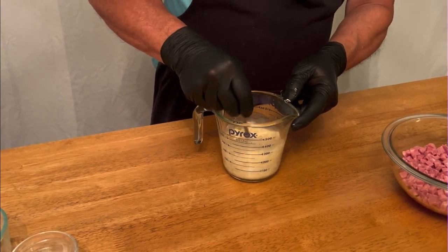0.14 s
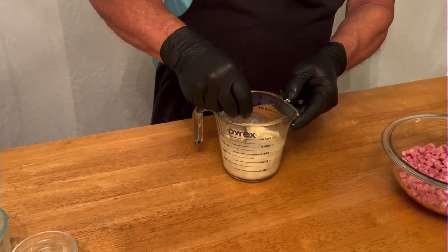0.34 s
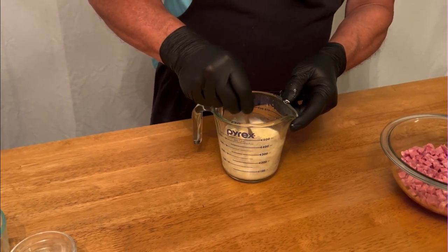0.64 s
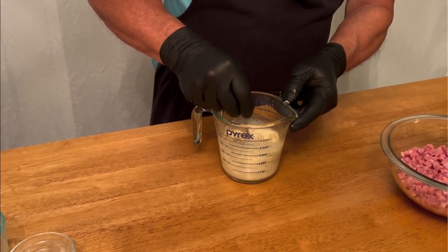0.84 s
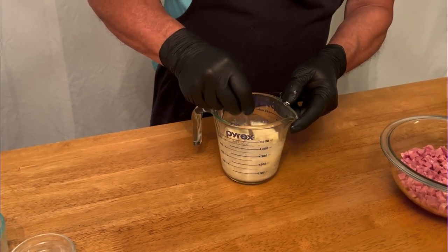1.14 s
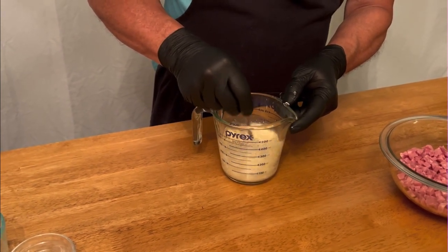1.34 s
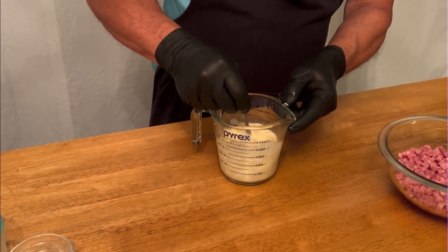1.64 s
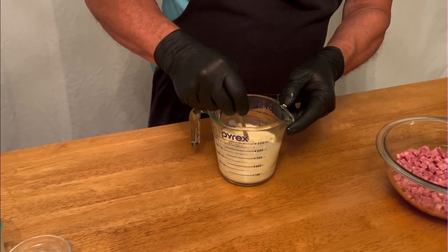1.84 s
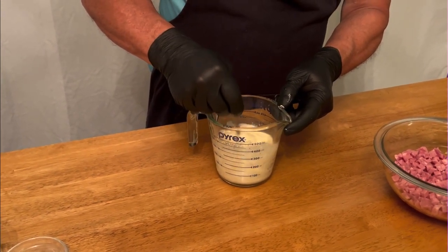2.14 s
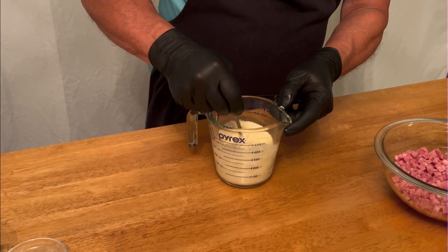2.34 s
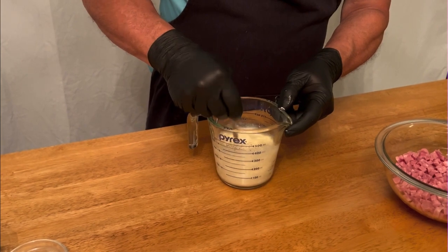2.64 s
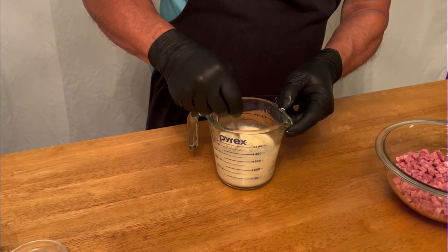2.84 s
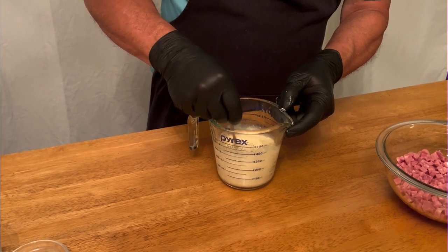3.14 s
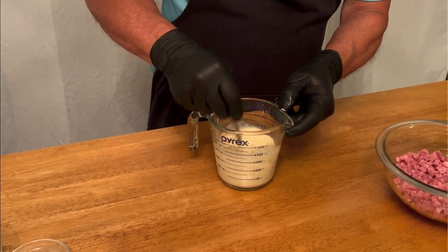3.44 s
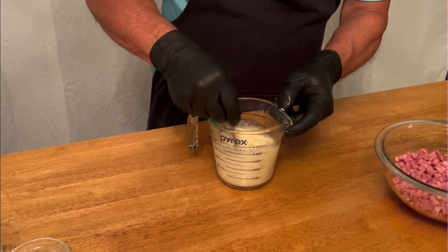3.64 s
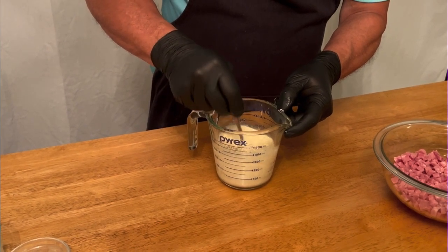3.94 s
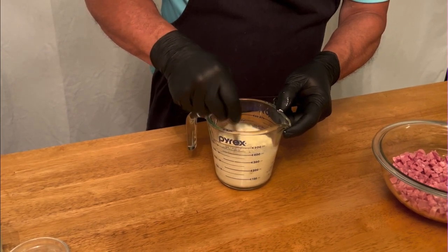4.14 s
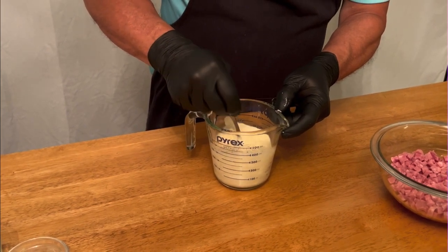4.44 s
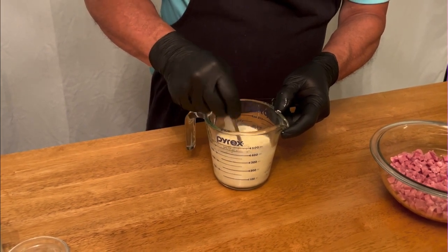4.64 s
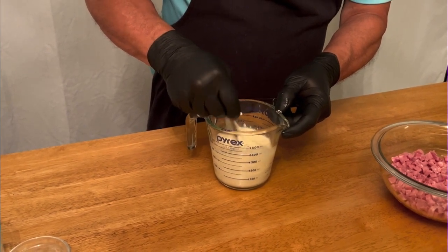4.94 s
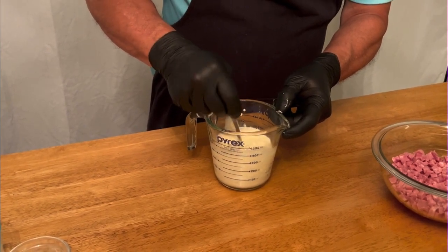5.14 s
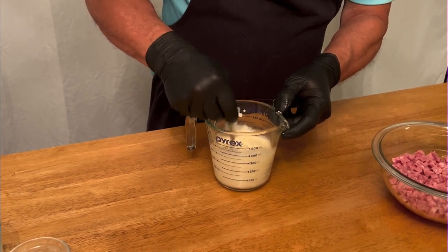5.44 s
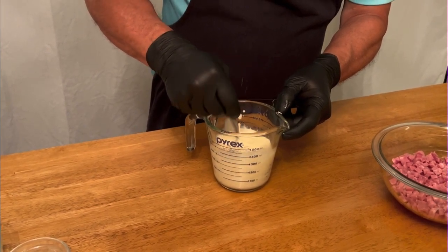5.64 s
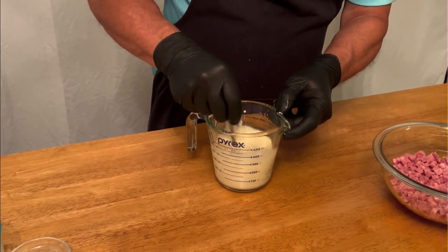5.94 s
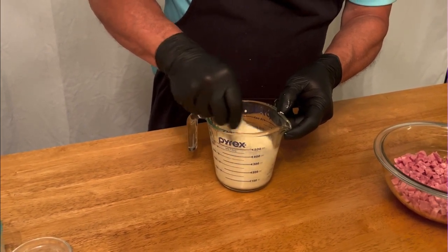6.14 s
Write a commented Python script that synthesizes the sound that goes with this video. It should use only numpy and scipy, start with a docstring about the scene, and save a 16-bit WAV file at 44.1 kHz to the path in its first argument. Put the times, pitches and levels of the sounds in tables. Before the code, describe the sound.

From the very start, a metal utensil stirs thick dressing in a glass measuring cup, knocking the side about every 0.18 seconds. Each knock combines a sharp tick, a short damped clink, a hollow note, a slight squelch and a thud through the wooden table, which keeps up a soft low rumble. Tiny wet smacks are scattered between the hits. At about 1.6 seconds one beat is missed and the dressing folds over very softly, then the rhythm resumes. From about 3.2 seconds most knocks come in tight pairs and grow louder, the hollow note slightly higher, with more little smacks between 4.4 and 5.1 seconds. After 5.6 seconds the knocks become irregular, ending with a quick cluster at around 6.1 to 6.3 seconds. The sound is close and in stereo, with the short echo of a small kitchen and faint steady room noise.

```python
"""A metal utensil whips thick dressing in a glass jug on a wooden table in a small kitchen.
From the start it knocks the damped glass about every 0.18 s: a tick, a clink, a hollow note, a squelch
and a thud that keeps the table swaying. The dressing smacks faintly; at 1.6 s a turn misses the wall
and the dressing folds over. From 3.2 s most knocks come in pairs and grow louder; after 5.6 s they turn
irregular. Throughout, the room adds a short tail, heard by two close microphone ports."""
import sys
import numpy as np
from scipy import signal
from scipy.fft import rfft, irfft, next_fast_len
from scipy.io import wavfile
from scipy.ndimage import uniform_filter1d

SR = 44100
rng = np.random.default_rng(int(sys.argv[2]) if len(sys.argv) > 2 else 0)


def log_audio(samples):
    """Write samples as a 16-bit WAV file to the path given in sys.argv[1]."""
    # one column per channel
    frames = np.atleast_2d(samples).T
    # limit to full scale, then quantise
    limited = np.clip(frames, -1, 1)
    pcm = np.round(limited * 32767).astype(np.int16)
    wavfile.write(sys.argv[1], SR, pcm)


N = 276507

# Blows on the wall: t/s, clink level/dB, thud, hollow, wall, tick levels/dB re clink,
# clink f/Hz, hollow f/Hz
KNOCKS = [(0.0299, -31.5, 5.5, 6.5, -20, 7.5, 2790, 713), (0.2103, -26, 0.5, 2.5, -6.5, 0, 3200, 706),
          (0.3455, -51, -13, 3.5, 8.5, 17.5, 2790, 990), (0.39, -23, -2.5, 1.5, -2, -0.5, 3200, 720),
          (0.574, -26, -0.5, -0.5, -5.5, 1, 3000, 657), (0.7462, -19, -4.5, -3.5, -13, -5, 4370, 750),
          (0.8762, -35, -21, -12, -27, 4.5, 2440, 720), (0.9167, -28, 3.5, 7, -0.5, 6.5, 2700, 705),
          (1.0894, -26.5, 1.5, 5.5, -17, 5.5, 2250, 730), (1.262, -30, 3, 7.5, -19, 5.5, 3040, 737),
          (1.4358, -27.5, 3.5, 6.5, -2.5, 4, 2070, 740), (1.7801, -25, 2, 3, -5.5, 4.5, 2250, 718),
          (1.966, -26, -1, -1, -10.5, -1, 3970, 767), (2.138, -25.5, 2, 1, -16, 3.5, 4100, 758),
          (2.313, -27, 6.5, 3, -9, 6.5, 4430, 772), (2.4853, -26, 7.5, 4.5, -7.5, 4, 2140, 793),
          (2.6714, -37.5, 14, 2, -14, 2.5, 2220, 775), (2.832, -24.5, 5, 5, -4, 4, 4410, 785),
          (3.0115, -26, 3, 2.5, -5.5, 5.5, 2280, 787), (3.1854, -25, 6.5, 3.5, -1, 2, 2530, 800),
          (3.2016, -29, -2.5, 6.5, -15, -1.5, 2340, 876), (3.3542, -19, 0, 1.5, -4, 2, 2360, 814),
          (3.5275, -23, 4.5, 2, -3, 4.5, 2170, 797), (3.5458, -19.5, -21.5, -6, -9.5, -10, 2600, 775),
          (3.702, -26, 6, 6, 1.5, 6, 2770, 630), (3.7241, -19.5, -8, -4.5, -13, -8.5, 2500, 866),
          (3.8737, -26.5, 6, 8, -1.5, 10, 2400, 815), (3.9001, -26.5, -27, -17, -11, -0.5, 2120, 740),
          (4.0457, -17.5, -0.5, -0.5, -10, 1.5, 2330, 763), (4.0699, -22, -25, 0.5, -6.5, -9, 2580, 910),
          (4.2197, -19, 0, -0.5, -8, 4.5, 2400, 820), (4.255, -23, -25, -5, -17, -4, 3000, 880),
          (4.3967, -21.5, 4.5, 2, 0.5, 6, 4040, 650), (4.4223, -12.5, -30, -8, -11, -12, 2750, 890),
          (4.573, -21.5, 3, 2.5, -10.5, 7.5, 2440, 684), (4.6036, -16, -23.5, -5.5, -11.5, -0.5, 2980, 880),
          (4.7516, -19, -0.5, 0, -5, 4.5, 2430, 783), (4.775, -15, -8, -3, -13.5, -4, 2640, 935),
          (4.9272, -17, -1, -0.5, -7, 3.5, 2200, 720), (4.9498, -14, -22, -9, -7, -5, 2320, 910),
          (5.1056, -18.5, -0.5, 2, -11, 5.5, 2300, 733), (5.1309, -14, -21, -7, -14, -2, 2600, 920),
          (5.2785, -22, 5.5, 4.5, -24, 10, 4300, 770), (5.2951, -16.5, -17, -8.5, -10.5, -11, 2940, 915),
          (5.4592, -19.5, -2, -3, -10.5, -0.5, 2240, 806), (5.6348, -18, -3.5, -3.5, -10.5, -2, 3970, 860),
          (5.8938, -20, -18.5, -18, -9, 8.5, 2260, 960), (6.0989, -14, -19, -18.5, -12.5, 1, 2340, 915),
          (6.135, -30.5, -19, -4, 1, -1, 3660, 1030), (6.1714, -38.5, -19, 3, -7, -12.5, 2320, 966),
          (6.2292, -32.5, -9.5, 15, -0.5, 8.5, 2300, 1050)]

def knocks():
    """Metal strikes glass and excites jug, dressing and table. Rows: ringing, contact noise."""
    mix, t = np.zeros((2, N + SR)), np.arange(SR // 4) / SR
    for start_s, db, thud_db, hollow_db, wall_db, tick_db, clink_hz, hollow_hz in KNOCKS:
        ringing = clink(t, clink_hz)
        contact = gain_of(tick_db) * tick(t, t60_s=0.017)
        t_jug, t_table = np.maximum(t - 0.0012, 0), np.maximum(t - 0.003, 0)  # low parts start later
        ringing += gain_of(wall_db) * wall(t_jug)
        ringing += gain_of(hollow_db) * hollow(t_jug, hollow_hz)
        ringing += gain_of(thud_db + SQUELCH_DB) * squelch(t)
        ringing += gain_of(thud_db) * thud(t_table)
        at = round(start_s * SR)
        mix[:, at:at + len(t)] += gain_of(db) * np.array([ringing, contact])
    return mix[:, :N]


# Upper glass modes: f/Hz, level/dB, t60/s
CLINK_MODES = [(2265, 1.5, 0.031), (2401, 3.5, 0.015), (2804, -1.5, 0.016), (2906, -3, 0.03),
               (3052, 1, 0.075), (3324, 0, 0.014), (3656, -3, 0.045), (3900, 0, 0.015), (4070, 7.5, 0.0089),
               (4890, 4.5, 0.0091)]

def clink(t, hz):
    """Upper wall modes, choked by the gloved hand."""
    return ring(CLINK_MODES, t, rise_s=0.0043, detune=0.01, near_hz=hz, reach=0.31, max_t60_s=0.016)


# Lower glass modes: f/Hz, level/dB, t60/s
WALL_MODES = [(1270, -5, .025), (1346, -3, .04), (1429, -2, .04), (1540, -4, .03), (1655, -4, .05),
              (1750, -4, .03)]

def wall(t):
    """Lower wall modes, damped by dressing and hand."""
    return ring(WALL_MODES, t, rise_s=0.042, detune=0.0073)


# Low modes of the filled jug: f/Hz, level/dB, t60/s
HOLLOW_MODES = [(587, -7.5, 0.035), (724.8, -2, 0.11), (781.2, -8.5, 0.22), (829.5, 4.5, 0.038),
                (890.5, 5, 0.054), (929, 1, 0.087), (1092, -8, 0.023)]

def hollow(t, hz):
    """The jug's hollow note; its pitch climbs as the dressing slides off."""
    t_glide = t + 0.11 * (t - 0.046 * (1 - np.exp(-t / 0.041)))
    return ring(HOLLOW_MODES, t_glide, rise_s=0.00089, detune=0.008, near_hz=hz, reach=0.094)


# Table-top modes: f/Hz, level/dB, t60/s
TABLE_MODES = [(49.3, -16.5, 0.66), (69, 2, 0.024), (101, 3, 0.059), (143.6, -10.5, 0.26),
               (165, -4.5, 0.11), (185.6, -1.5, 0.18), (244, -0.5, 0.1), (274.6, -0.5, 0.058),
               (349.3, -26.5, 0.015), (443.7, -10, 0.066)]

def thud(t):
    """The blow passes into the wooden table."""
    return ring(TABLE_MODES, t, rise_s=0.0021, detune=0.024)


# Metal-on-glass spectrum: f/Hz, level/dB
TICK_SPECTRUM = [(150, -39), (400, -7.5), (700, -8.5), (1200, -1.5), (2400, -5), (3500, -7.5), (4500, -1.5),
                 (5500, -11), (7000, -9), (8300, -8.5), (10000, -7), (11500, -13), (13500, -8.5),
                 (15300, -11.5), (16800, -25)]

def tick(t, t60_s):
    """Contact click with brief chatter; peak 1 above 6 kHz."""
    hz = abs(np.fft.fftfreq(1024, 1 / SR))
    log_gain = np.log(gain_of(read(TICK_SPECTRUM, hz)))
    click = np.fft.ifft(np.exp(np.conj(signal.hilbert(log_gain)))).real[:512]  # minimum phase
    chatter = rng.standard_normal(len(t)) * gain_of(-60 * t / t60_s) * (1 - np.exp(-t / 0.0004))
    chatter[16] += 5  # one firm contact keeps the colour alike between blows
    sound = signal.oaconvolve(chatter, click)[:len(t)]
    treble = signal.sosfilt(signal.butter(4, 6000, "highpass", fs=SR, output="sos"), sound[:600])
    return sound / abs(treble).max()


SQUELCH_DB, SQUELCH_PEAK_S = -16.5, 0.023  # nominal level re thud
SQUELCH_START_HZ, SQUELCH_TOP_HZ, SQUELCH_CLIMB_S = 1143.5, 1814, 0.045  # nominal glide

def squelch(t):
    """An air pocket closes behind the utensil: a ragged tone that climbs and levels off."""
    pitch, size = rng.standard_normal(2)
    hz = SQUELCH_TOP_HZ - (SQUELCH_TOP_HZ - SQUELCH_START_HZ) * np.exp(-t / SQUELCH_CLIMB_S)
    tone = np.sin(2 * np.pi * (1 + 0.05 * pitch) * np.cumsum(hz) / SR)
    ragged = unit_rms(uniform_filter1d(uniform_filter1d(rng.standard_normal(len(t)), 130), 130))
    swell = (t / SQUELCH_PEAK_S * np.exp(1 - t / SQUELCH_PEAK_S)) ** 2
    return gain_of(2.5 * size) * swell * (0.2 + 0.7 * ragged) * tone


# Dressing releases: t/s, level/dB, f/Hz
SMACKS = [(.084, -49, 12200), (.538, -52, 6500), (0.718, -43, 2460), (0.797, -33.5, 4460),
          (1.0514, -43, 7100), (1.247, -62, 12500), (1.57, -53, 3360), (1.646, -51, 2470),
          (2.624, -51, 3250), (2.803, -54, 6500), (4.378, -42, 7440), (4.563, -38, 12800),
          (4.609, -41, 12800), (4.709, -45, 8500), (4.882, -48.5, 6750), (4.913, -47, 6470),
          (5.034, -48, 9000), (5.038, -40.5, 6160), (5.059, -42.5, 7000), (5.433, -53, 12000),
          (5.6198, -31, 1770), (6.03, -52, 6940)]

def smacks():
    """Dressing lets go of metal or glass: a tiny bright tick with a pitched blip."""
    mix, t = np.zeros(N + SR), np.arange(800) / SR
    for start_s, db, hz in SMACKS:
        blip = np.sin(2 * np.pi * hz * t) * gain_of(-60 * t / 0.011)
        snap = filtered(tick(t, t60_s=0.0024), lambda f: (f / hz) ** 2 / (1 + (f / hz) ** 2.3))
        at = round(start_s * SR)
        mix[at:at + len(t)] += gain_of(db) * (0.6 * blip + 1.1 * snap)
    return mix[:N]


# Fold envelope: t/s, level/dB
SLOP_LEVEL = [(1.6, -83), (1.63, -57.5), (1.68, -65), (1.73, -72)]
# Fold spectrum: f/Hz, level/dB
SLOP_SPECTRUM = [(150, -28), (300, -16.5), (450, -8), (600, -14.5), (900, -20.5), (1500, -18),
                 (4000, -56.5), (8000, -110)]

def slop():
    """The dressing folds over softly in a missed turn."""
    return envelope(SLOP_LEVEL) * noise(SLOP_SPECTRUM, coherence=0.73)


# Rocking under the stirring arm: t/s, level/dB
STIR_LEVEL = [(0.0, -52.5), (1.38, -47), (1.8, -44), (4.12, -45), (4.54, -48.5), (5.03, -46.5),
              (5.66, -42.5), (5.83, -49.5), (6.27, -78)]
# Rocking spectrum: f/Hz, level/dB
SWAY_SPECTRUM = [(20, -56.5), (35, 10), (50, 7), (70, 9), (100, -3.5), (160, -12), (400, -45.5),
                 (2000, -110)]
JOLT_DB, JOLT_RISE_S, JOLT_T60_S = -14.5, 0.03, 0.36  # level re thud

def sway():
    """The table rocks under the stirring and swells after each thud."""
    t, swells = np.arange(0, N, 64) / SR, 0
    for start_s, db, thud_db, *_ in KNOCKS:
        age_s = np.maximum(t - start_s, 0)
        decay = gain_of(db + thud_db + JOLT_DB - 60 * age_s / JOLT_T60_S)
        swells += decay * (1 - np.exp(-age_s / JOLT_RISE_S))
    rocking = envelope(STIR_LEVEL) * noise(SWAY_SPECTRUM, coherence=0.26)
    jolts = np.interp(np.arange(N) / SR, t, swells) * noise(SWAY_SPECTRUM, coherence=0.33)
    return rocking + jolts


# Room decay: f/Hz, t60/s
TAIL_T60 = [(100, 0.33), (400, 0.33), (1100, 0.32), (3000, 0.25), (6000, 0.26), (9000, 0.21), (14000, 0.2)]
# Tail gain: f/Hz, level/dB
TAIL_LEVEL = [(100, 4.5), (300, -3.5), (500, 5.5), (800, -6), (1300, -2), (2000, -7), (3500, -1),
              (5500, -8.5), (8300, -7.5), (10000, -14), (12000, -11.5), (14500, -14), (16000, -15.5)]
# Left-right likeness of the tail: f/Hz, coherence
TAIL_COHERENCE = [(100, 0.59), (300, 0.55), (700, 0.16), (1600, 0.12), (2100, 0.97), (3200, 0.67),
                  (4300, 0.41), (5500, 0.75), (6500, 0.66), (15000, 1)]

def kitchen_tail():
    """Stereo impulse response: dense random echoes, each band dying at its own rate."""
    onset = np.minimum(np.arange(SR // 2) / (0.0042 * SR), 1) ** 2
    hz, t, bands = signal.stft(rng.standard_normal((2, SR // 2)) * onset, SR, nperseg=256)
    hz = hz[:, None]
    bands = correlated(*bands, read(TAIL_COHERENCE, hz))
    t60_s = read(TAIL_T60, hz)
    decay = gain_of(read(TAIL_LEVEL, hz) - 60 * t / t60_s)
    energy_norm = np.sqrt(6 * np.log(10) / (t60_s * SR))
    return signal.istft(bands * decay * energy_norm, SR, nperseg=256)[1]


# Quiet-kitchen spectrum: f/Hz, level/dB
AIR_SPECTRUM = [(100, 0), (300, -10), (800, -24), (2000, -36), (3500, -42), (7000, -49), (10000, -60),
                (13000, -52), (16000, -62)]
AIR_DB = -62

def room_air():
    """Faint steady room noise."""
    return gain_of(AIR_DB) * noise(AIR_SPECTRUM, coherence=0.59)


def ring(modes, t, rise_s, detune, near_hz=None, reach=1, max_t60_s=1):
    """Struck modes, varied per blow by the load of dressing; strongest around near_hz; peak 1."""
    hz, db, t60_s = np.transpose(modes)[:, :, None]
    level_draw, pitch_draw = rng.standard_normal((2,) + hz.shape)
    if near_hz:
        db = db - np.minimum(6 * abs(np.log(hz / near_hz)) / reach, 14)
    decays = gain_of(db + 2 * level_draw - 60 * t / np.minimum(t60_s, max_t60_s))
    tones = np.sin(2 * np.pi * hz * (1 + detune * pitch_draw) * t)
    sound = (decays * tones).sum(0) * (1 - np.exp(-t / rise_s))
    return sound / abs(sound).max()


def noise(spectrum, coherence):
    """Coloured stereo noise, rms 1."""
    pair = correlated(*rng.standard_normal((2, N)), coherence)
    return unit_rms(filtered(pair, lambda hz: gain_of(read(spectrum, hz))))


def correlated(a, b, coherence):
    """Partly alike stereo pair from two independent noises."""
    return np.array([a, coherence * a + np.sqrt(1 - coherence ** 2) * b])


def envelope(curve):
    """Level curve to gain per sample."""
    return gain_of(np.interp(np.arange(N) / SR, *np.transpose(curve)))


def gain_of(db):
    """dB to amplitude."""
    return 10 ** (np.asarray(db) / 20)


def unit_rms(x):
    """Scales to rms 1."""
    return x / np.sqrt(np.mean(x ** 2) + 1e-20)


def read(points, hz):
    """Interpolates a table over log frequency."""
    f, value = np.transpose(points)
    return np.interp(np.log(hz + 1), np.log(f + 1), value)


def filtered(x, response):
    """Multiplies the spectrum by response(hz)."""
    size = next_fast_len(x.shape[-1] + 4096)
    return irfft(rfft(x, size) * response(np.fft.rfftfreq(size, 1 / SR)), size)[..., :x.shape[-1]]


def scene():
    """Knocks and smacks with their room tail, over sway, slop and air."""
    rings, contacts = knocks()
    contacts = contacts + smacks()
    send = gain_of(-2.5) * rings + gain_of(4.5) * contacts  # contact noise spreads wider than the ring
    fade_rad = 2 * np.pi * 1.1 * np.arange(N) / SR  # two tails crossfade into one even, smooth echo
    wet = sum(signal.fftconvolve((send * fade)[None], kitchen_tail(), axes=1)[:, :N]
              for fade in (np.cos(fade_rad), np.sin(fade_rad)))
    return rings + contacts + wet + sway() + slop() + room_air()


# Left port minus right: f/Hz, level/dB
PORT_BALANCE = [(60, 0), (110, -1), (200, 6.5), (380, 4), (700, 7), (1290, 1), (2380, 0.5), (4400, 3),
                (8120, 0.5), (15000, 0.0)]
# Left port's lead: f/Hz, phase/rad
PORT_PHASE = [(50, -.6), (300, -.1), (600, -.9), (1100, -.9), (1450, -1.9), (1900, 0), (3300, 1),
              (4900, .7), (5500, -.9), (6500, 0), (7800, -.8), (9000, -2.4), (10500, -3.7), (12100, -5.7),
              (14000, -7.5), (15700, -9.3)]
LOW_CUT_HZ, HIGH_CUT_HZ = 42, 16600

def record(dry):
    """Band-limited microphone; its two ports differ in level and phase with frequency."""
    side = np.array([[0.5], [-0.5]])
    dry = signal.sosfilt(signal.butter(3, LOW_CUT_HZ, "highpass", fs=SR, output="sos"), dry)
    ports = filtered(dry, lambda hz: gain_of(side * read(PORT_BALANCE, hz))
                     * np.exp(1j * side * read(PORT_PHASE, hz)))
    lowpass = signal.firwin(511, HIGH_CUT_HZ, window=("kaiser", 9), fs=SR)
    return signal.oaconvolve(ports, lowpass[None], "same")


dry = scene()
out = record(dry)
log_audio(out)
```